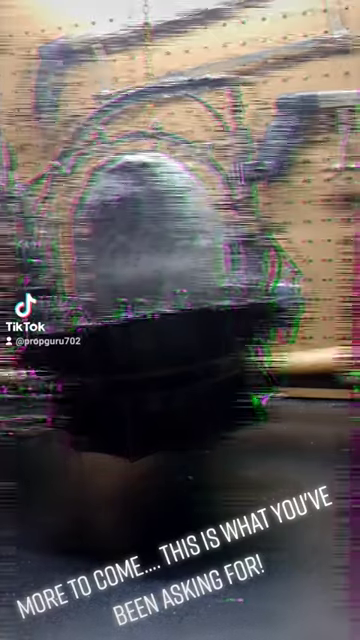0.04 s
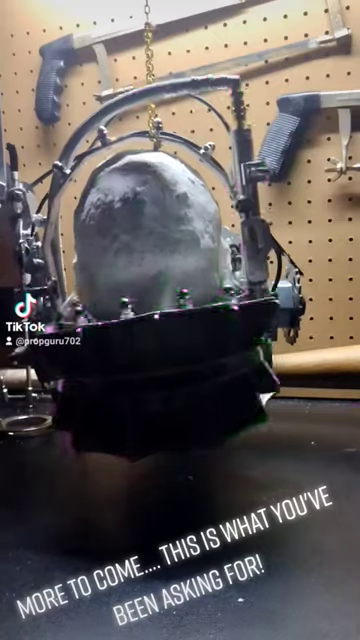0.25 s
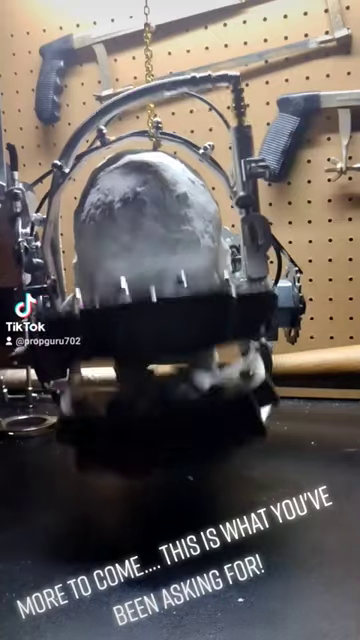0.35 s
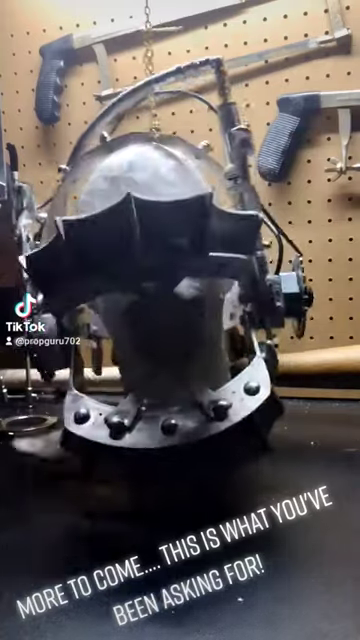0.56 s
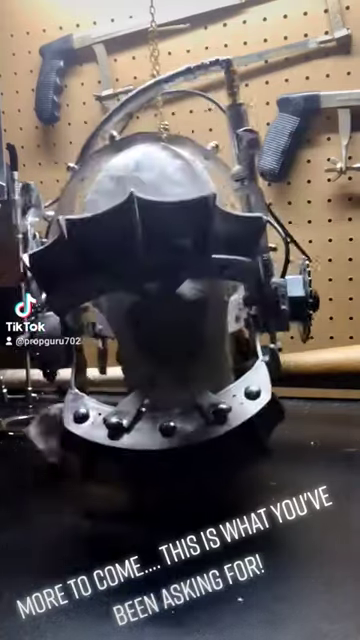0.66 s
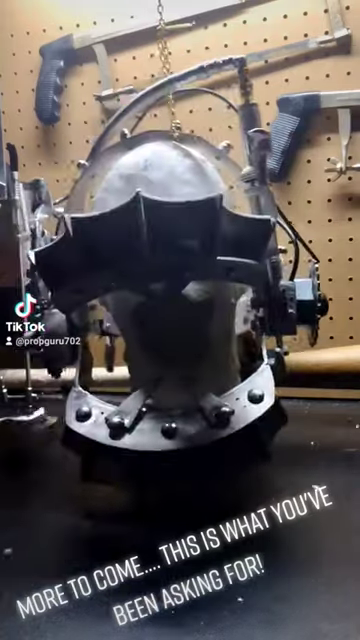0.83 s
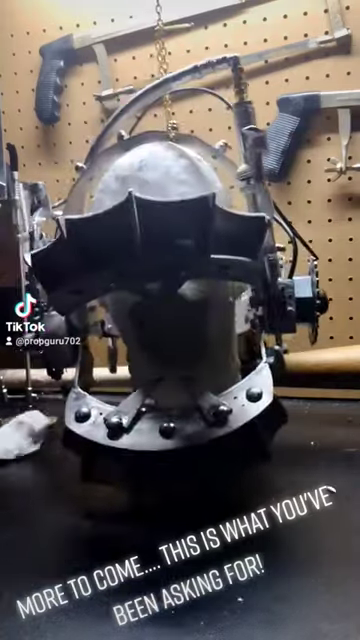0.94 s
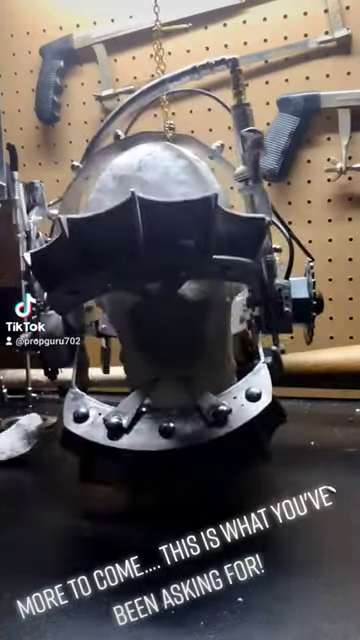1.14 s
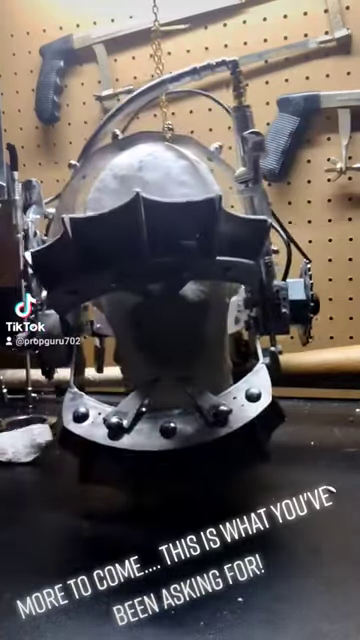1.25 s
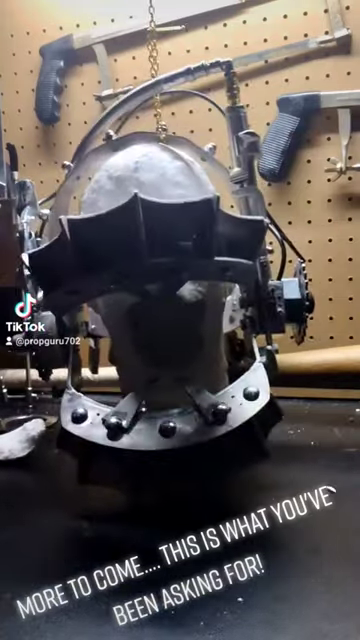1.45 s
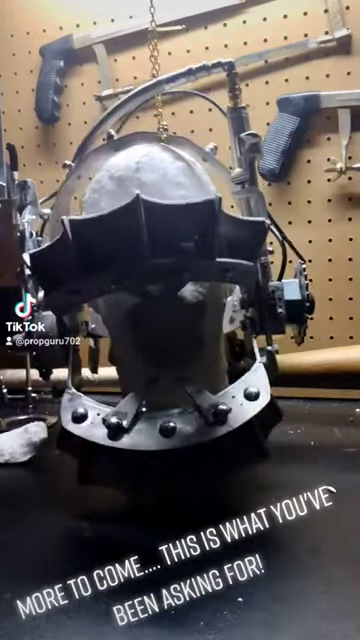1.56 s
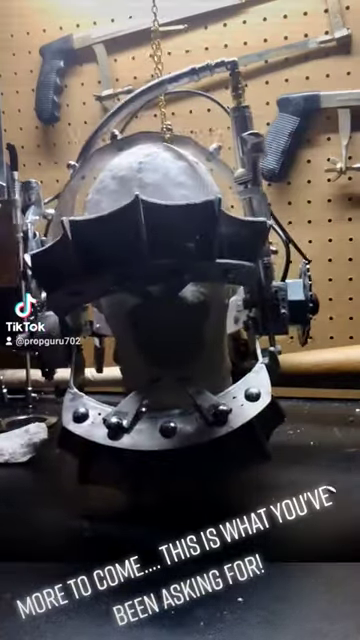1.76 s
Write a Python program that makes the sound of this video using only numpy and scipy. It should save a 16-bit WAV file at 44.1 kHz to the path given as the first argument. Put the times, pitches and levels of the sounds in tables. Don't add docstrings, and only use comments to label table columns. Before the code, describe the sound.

A steel jaw contraption slams open on a wooden bench in a small workshop: faint latch tick, two hard clanging bursts, rattling parts, then a light chunk bouncing amid hissing air, captured close by a phone.

```python
import sys
import numpy as np
from scipy import signal
from scipy.fft import rfft, irfft
from scipy.io import wavfile
from scipy.ndimage import uniform_filter1d

SR = 44100
rng = np.random.default_rng(int(sys.argv[2]) if len(sys.argv) > 2 else 0)


def convert_level_to_amplitude(level_db):
    exponent = np.asarray(level_db, float) / 20
    return 10 ** exponent


def wrap_up_sound(samples):
    columns = np.atleast_2d(samples).T
    tamed = np.clip(columns, -1, 1)
    steps = np.round(tamed * 32767).astype(np.int16)
    wavfile.write(sys.argv[1], SR, steps)


N = 79380
T = np.arange(N) / SR
LEFT_RIGHT = np.array([[.5], [-.5]])


def unit(x):
    return x / np.sqrt(np.mean(x ** 2))


def fade(t, t60):
    return np.exp(-np.log(1000) * t / np.maximum(t60, .002))


def low_cut(x, order, hz):
    return signal.sosfilt(signal.butter(order, hz, "high", fs=SR, output="sos"), x)


def dull(x, hz):
    return signal.lfilter(*signal.butter(1, hz, fs=SR), x)


def favour(hz, face_hz, db):
    octaves = np.log2(hz / face_hz)
    return db * (np.exp(-(octaves / .7) ** 2) - 1)


def colour(x, points, tilt_db=0., face_hz=1000., favour_db=0.):
    size = x.shape[-1]
    f = np.maximum(np.arange(size // 2 + 1) * SR / size, 10)
    hz, db = np.array(points).T
    shape = np.interp(np.log(f), np.log(hz), db)
    tilt = tilt_db * np.log2(np.clip(f, 300, 16000) / 2000)
    return irfft(rfft(x) * convert_level_to_amplitude(shape + tilt + favour(f, face_hz, favour_db)), size)


def pair(size, alike_hz):
    mid, side = rng.standard_normal((2, size))
    side = signal.lfilter(*signal.butter(1, alike_hz, "high", fs=SR), side)
    return np.array([mid + side, mid - side]) / np.sqrt(2)


def ring(modes, t, stretch, face_hz, favour_db, detune=.02, apart=1.):
    hz, db, t60 = np.repeat(np.array(modes), 2, axis=0).T[:, :, None]
    pitch, level, *sides = rng.standard_normal((4, len(hz), 1))
    hz = hz * (1 + detune * pitch)
    gain = convert_level_to_amplitude(db + favour(hz, face_hz, favour_db) + 1.1 * level) * fade(t, t60 * stretch)
    turn = apart * np.minimum(hz / 1500, 1)
    return np.array([np.sum(gain * np.sin(2 * np.pi * hz * t + turn * side), axis=0) for side in sides])


def ticks(per_s, spread_db):
    return (rng.random(N) < per_s / SR) * convert_level_to_amplitude(spread_db * rng.exponential(size=N))


def add(out, s, x):
    i = int(s * SR)
    out[:, i:i + x.shape[1]] += x[:, :N - i]


def curve(table):
    return np.interp(T, *np.array(table).T, left=-120, right=-120)


# start in seconds, peak in dB, brightness in dB per octave,
# ring length as a factor, favoured pitch in Hz.
SLAMS = [(.141, -39.5, 3, 0.17, 3750), (0.201, -48, 9.5, 1, 8540), (.213, -39, 0.5, 1, 3114),
         (0.2225, -9, 2, 0.38, 5500), (.238, 0, -0.5, 0.39, 1805), (0.2598, 0.5, 1, 1, 3660),
         (.376, -24, -5.5, .5, 1000), (0.3929, -4.5, -2.5, 0.44, 1452), (.404, -6.5, -3, 1, 2500),
         (.411, -6.5, -4, 0.2, 3050), (.424, -5.5, -1, 0.2, 2200), (.432, -15, 1.5, 0.31, 2200),
         (.462, -8, -1.5, 0.47, 1450), (.467, -6.5, -1, 0.18, 1850)]
# pitch in Hz, level in dB, 60 dB fade in seconds.
STEEL_MODES = [(503.4, -0.5, 0.082), (900, -5, 0.16), (1157, -5, 0.087), (1483, 5.5, 0.031),
               (2035, -11.5, 0.045), (3164, -7.5, 0.07), (3480, -9, 0.37), (3750, -10, 0.077),
               (4070, -5, 0.086), (5220, -6.5, 0.3), (5590, -6, 0.064), (6350, -6.5, .1),
               (6390, -8.5, 0.04), (8860, -16.5, .08)]
# frequency in Hz, level in dB per Hz.
CRACK_COLOUR = [(120, -43.5), (300, -12), (700, -10.5), (1480, -12.5), (3430, -10.5), (7000, -15.5),
                (14600, -22.5), (16000, -32)]


def slams():
    out, t = np.zeros((2, N)), T[:SR // 2]
    crack_t60_s, tail_t60_s, tail_db, ring_db = .03, .25, -3, -13
    chatter_per_s, chatter_t60_s, chatter_share = 1200, .012, .5
    for s, db, tilt_db, stretch, face_hz in SLAMS:
        noise = unit(colour(pair(len(t), 1200), CRACK_COLOUR, tilt_db, face_hz, favour_db=1))
        crack = noise * fade(t, crack_t60_s * stretch)

        grains = signal.fftconvolve(ticks(chatter_per_s, 2.2), fade(t, chatter_t60_s))
        chatter = unit(grains[len(t):2 * len(t)])
        roughness = 1 + chatter_share * (chatter - 1)
        tail = convert_level_to_amplitude(tail_db) * dull(noise, 7900) * roughness * fade(t, tail_t60_s * stretch)

        steel = convert_level_to_amplitude(ring_db) * ring(STEEL_MODES, t, stretch, face_hz, 7, detune=.008, apart=1.7)
        steel = colour(steel, [(100, 0), (200, 0)], tilt_db)
        onset = np.minimum(t / .0006, 1)
        add(out, s - .001, convert_level_to_amplitude(db) * ((crack + tail) / 2 + steel) * onset)
    return out


# peak time in seconds, peak in dB, contact in ms.
JOLTS = [
    (.2586, 1, 1.2),
    (.392, -1, 1.0),
]


def jolts():
    out = np.zeros((2, N))
    for s, db, contact_ms in JOLTS:
        bump = np.pad(np.hanning(int(contact_ms * SR / 1000) + 3), (0, SR // 50))
        push = signal.lfilter(*signal.butter(1, 220, "high", fs=SR), bump)
        add(out, s - contact_ms / 2000, -convert_level_to_amplitude(db) * push[None])
    return out


# start in seconds, peak in dB, favoured pitch in Hz, ring length as a factor.
KNOCKS = [(0.582, -17, 1540, 1), (.597, -17, 855, 0.23), (.607, -23, 886, 0.85), (0.62, -17, 1000, 0.33),
          (0.622, -18, 1410, 0.3), (0.64, -6, 2000, 1), (0.664, -18, 1147, 1), (0.755, -21, 881, 1),
          (0.782, -19.5, 1000, 1), (0.791, -33, 1230, .7), (0.807, -6.5, 1700, 0.5), (.811, -11, 2486, 1),
          (0.826, -17, 2600, 1), (.862, -22, 1130, 0.6), (.871, -22, 1000, 1), (0.902, -31, 1210, 1),
          (0.981, -42, 838, 0.97), (1.089, -35, 804, 1), (1.096, -37, 900, .8), (1.143, -34.5, 1072, 0.96),
          (1.149, -38.5, 2540, .8), (1.166, -39.5, 2580, 0.95), (1.172, -36.5, 900, 1),
          (1.186, -49, 1426, 1), (1.278, -42, 857, 0.85), (1.374, -49.5, 990, 0.92),
          (1.439, -47.5, 2636, 0.6), (1.441, -38.5, 900, .8), (1.46, -38, 858, 0.9), (1.471, -43.5, 900, 1),
          (1.493, -36, 840, 0.5), (1.498, -39, 2567, 0.71), (1.508, -40.5, 414, 0.73),
          (1.532, -63, 2580, .8), (1.537, -54, 900, .8)]
# pitch in Hz, level in dB, 60 dB fade in seconds.
CHUNK_MODES = [(400, -6, .05), (600, -5, .05), (845, -2, .045), (990, -3, .04), (1140, -4, .04),
               (1400, -3, .055), (1620, -3, .04), (2000, -7, .03), (2320, -6, .03), (2580, -1, .065),
               (2950, -8, .025), (3650, -9, .025)]
# frequency in Hz, level in dB per Hz.
CLICK_COLOUR = [(150, -40), (400, -10), (900, 0), (1500, 0), (2600, -1), (3800, -4), (5200, -10),
                (8000, -25)]


def knocks():
    out, t = np.zeros((2, N)), T[:SR // 4]
    knock_db, pan_db, favour_db = 5.5, 2.5, 11
    snap_t60_s, scuff_t60_s, scuff_db = .016, .082, -6
    for s, db, face_hz, stretch in KNOCKS:
        body = ring(CHUNK_MODES, t, stretch, face_hz, favour_db, detune=.012, apart=.9)
        noise = unit(colour(pair(len(t), 1700), CLICK_COLOUR, face_hz=face_hz, favour_db=favour_db))
        scuff = convert_level_to_amplitude(scuff_db) * noise * fade(t, scuff_t60_s * stretch)
        snap = unit(colour(pair(len(t), 1500), CLICK_COLOUR)) * fade(t, snap_t60_s)
        snap = snap * convert_level_to_amplitude(18 + .5 * db)
        knock = (body + snap + scuff) * np.minimum(t / .00042, 1)
        add(out, s - .001, convert_level_to_amplitude(db + knock_db) * knock / np.abs(knock).max())
    return low_cut(out, 2, 250) * convert_level_to_amplitude(LEFT_RIGHT * pan_db)


# time in seconds, level in dB.
SHAKE = [
    [(.24, -45), (.3, -19.5), (.37, -28.5), (.4, -11), (.44, -25.5), (.5, -27.5), (.56, -33.5)],
    [(.57, -35.5), (.68, -30), (.75, -35.5), (.79, -34), (.88, -28), (.93, -74.5), (.97, -66), (1.05, -87)],
]
# frequency in Hz, level in dB per Hz.
RATTLE_COLOUR = [(120, -26.5), (200, -10.5), (1390, -9.5), (3920, -19.5), (4450, -34.5), (4780, -29),
                 (6000, -40), (7800, -51), (13200, -120)]


def rattle():
    per_s, spread_db, t60_s = 1400, 2.5, .018
    grains = signal.fftconvolve(ticks(per_s, spread_db), fade(T[:SR // 10], t60_s))[:N]
    level = np.maximum(*map(curve, SHAKE))
    return unit(colour(pair(N, 1600) * grains, RATTLE_COLOUR)) * convert_level_to_amplitude(level)


# start in seconds, peak in dB, contact in ms.
THUMPS = [(0.24, -24.5, 1.6), (0.261, -10, 1.63), (0.276, -10.5, 1.9), (0.296, -14, 0.97), (0.312, -9, 2),
          (0.336, -12, 0.53), (0.35, -5, 2.6), (0.372, -6.5, 1.24), (0.392, -14, 0.96), (0.402, -11.5, 1),
          (0.416, -4, 1.6), (0.428, -11.5, 2.1), (0.443, -10.5, 4.1), (0.453, -8.5, 3), (0.476, -26, 2.1),
          (0.495, -19.5, 2.1), (0.596, -47, 2), (0.695, -45, 4.7), (0.791, -28, 3.5), (0.891, -32, 0.96)]
# time in seconds, level in dB.
TREMBLE = [(0.5, -38.5), (0.752, -56), (0.89, -61.5), (1.248, -64.5), (1.418, -67.5), (1.614, -71),
           (1.8, -80.5)]
# pitch in Hz, level in dB, 60 dB fade in seconds.
BENCH_MODES = [(117, -15, .35), (120, -5, .2), (160, -8, .07), (196, -1, .13), (231, -4, .1),
               (270, -3, .11), (352, -1, .12), (433, -4, .09), (519, -4, .1), (555, -6, .08),
               (635, -6, .08)]


def bench():
    thump_db, tremble_db, apart = -8, -4.5, .4
    push = np.zeros((1, N))
    for s, db, contact_ms in THUMPS:
        bump = np.hanning(int(contact_ms * SR / 1000) + 3)
        add(push, s, -convert_level_to_amplitude(db + thump_db) * bump[None] / bump.sum())

    hz, db, t60 = np.array(BENCH_MODES).T[:, :, None]
    t = T[:SR // 2]
    gain = convert_level_to_amplitude(db) * fade(t, t60)
    phases = apart * rng.standard_normal((2, *hz.shape))
    top = np.array([np.sum(gain * np.sin(2 * np.pi * hz * t + phase), axis=0) for phase in phases])

    feet = unit(uniform_filter1d(rng.standard_normal(N), size=40)) * convert_level_to_amplitude(curve(TREMBLE) + tremble_db)
    feet = feet / np.sqrt(np.sum(top ** 2) / 2)
    heard = signal.fftconvolve(push + feet, top, axes=1)[:, :N]
    return low_cut(heard, 4, 111.6)


# time in seconds, level in dB.
VENT = [(.256, -21.5), (.36, -37.5), (.42, -28), (.58, -26), (.72, -27.5), (.755, -36.5), (.97, -37.5),
        (1.25, -44.5), (1.37, -51), (1.44, -59), (1.6, -63), (1.8, -76)]
# frequency in Hz, level in dB per Hz.
VENT_COLOUR = [(300, -25.5), (1500, -32), (3300, -17.5), (4600, -15.5), (6000, -14), (8500, -12),
               (12500, -16), (15200, -7)]


def vent():
    vent_db, pan_db, flutter_db, alike = 3, 5.5, .16, .13
    a, b = rng.standard_normal((2, N))
    right = alike * a + np.sqrt(1 - alike ** 2) * b
    air = unit(colour(np.array([a, right]), VENT_COLOUR))
    flutter = unit(uniform_filter1d(rng.standard_normal(N), size=1500))
    onset = np.clip((T - VENT[0][0]) / .008, 0, 1)
    level = np.interp(T, *np.array(VENT).T)
    return air * onset * convert_level_to_amplitude(level + vent_db + flutter_db * flutter + LEFT_RIGHT * pan_db)


# frequency in Hz, level in dB per Hz.
SHOP_COLOUR = [(30, -12.5), (70, -12.5), (130, -1.5), (250, -2.5), (500, -6.5), (1200, -19.5),
               (4000, -17.5), (15500, -22.5)]


def shop():
    room_db, hum_hz, hum_db, sway_db = -68.5, 119.5, -71, 1.7
    sway = unit(uniform_filter1d(rng.standard_normal(N), size=4000))
    hum = convert_level_to_amplitude(hum_db + sway_db * sway) * np.sqrt(2) * np.sin(2 * np.pi * hum_hz * T)
    return unit(colour(pair(N, 700), SHOP_COLOUR)) * convert_level_to_amplitude(room_db) + hum


def walls(hits):
    room_t60_s, room_db = .23, -9
    far_t60_s, far_db = 4.1, -38
    t = T[:SR]
    decay = fade(t, room_t60_s) + convert_level_to_amplitude(far_db) * fade(t, far_t60_s)
    echo = dull(pair(len(t), 610), 4350) * decay * np.minimum(t / .0051, 1)
    echo = echo / np.sqrt(np.sum(echo ** 2) / 2)
    return convert_level_to_amplitude(room_db) * signal.fftconvolve(hits.mean(axis=0)[None], echo, axes=1)[:, :N]


def scene():
    hits = slams() + jolts() + knocks() + rattle()
    top = bench()
    near = hits + top + vent()
    left_lag_s = .00009
    near = np.array([np.roll(near[0], int(left_lag_s * SR)), near[1]])
    bench_echo_db = -8
    return near + walls(hits + convert_level_to_amplitude(bench_echo_db) * top) + shop()


def band_limit(x):
    return signal.sosfilt(signal.butter(12, 16270, fs=SR, output="sos"), x)


def record(dry):
    x = low_cut(dry, 2, 45)
    x = .92 * np.tanh(x / .92)
    x = signal.sosfilt(signal.ellip(12, .2, 100, 15550, fs=SR, output="sos"), x)
    return band_limit(x)


dry = scene()
out = record(dry)
wrap_up_sound(out)
```